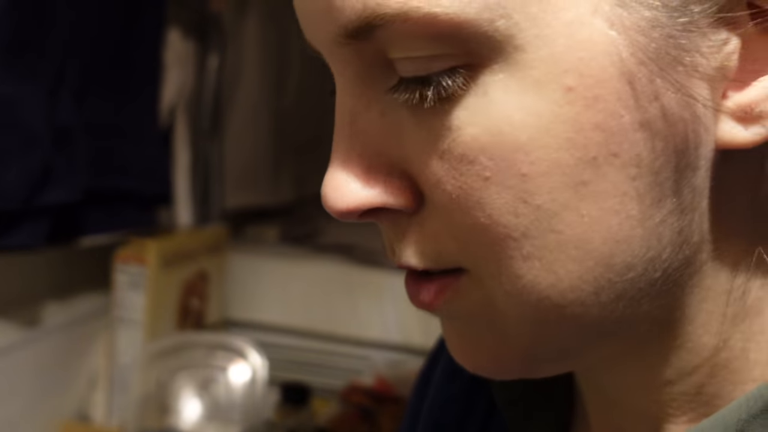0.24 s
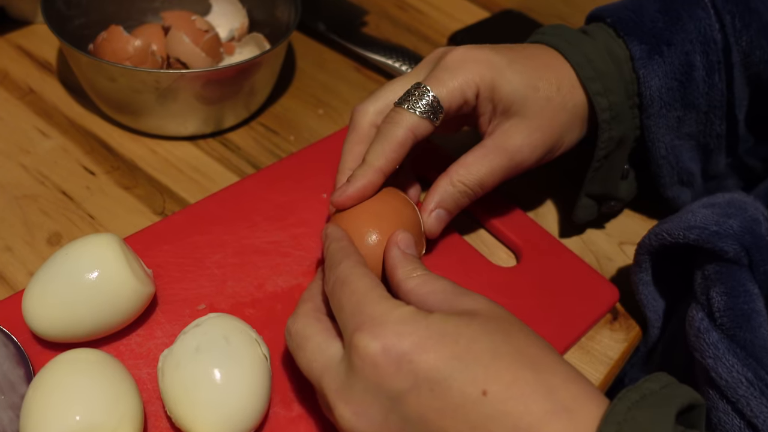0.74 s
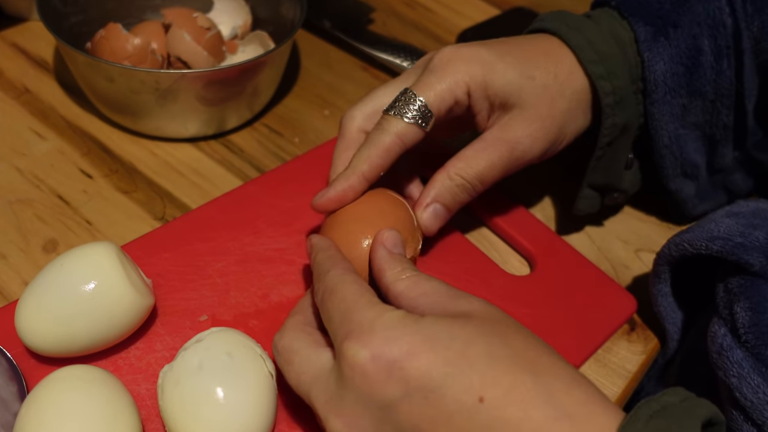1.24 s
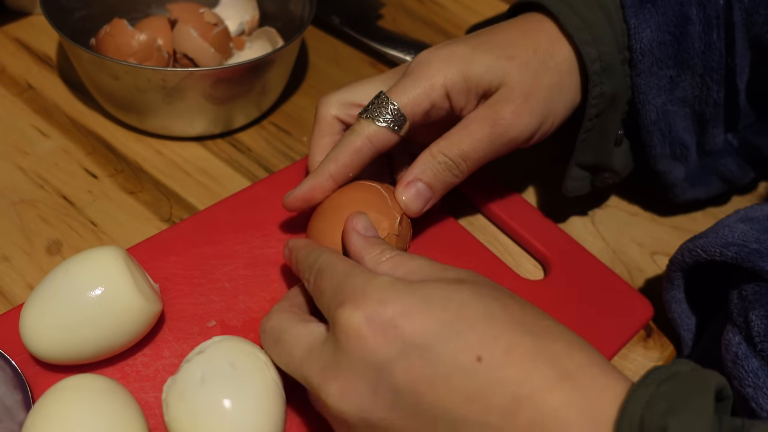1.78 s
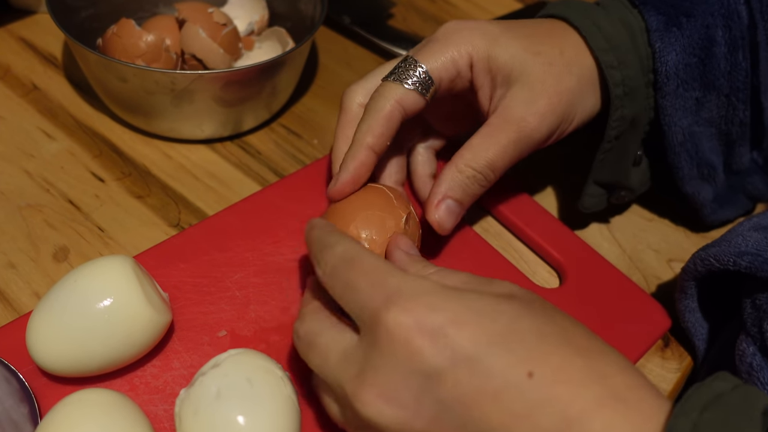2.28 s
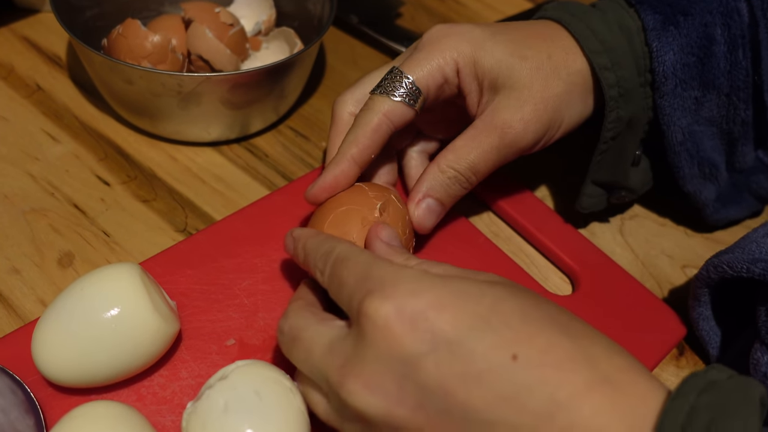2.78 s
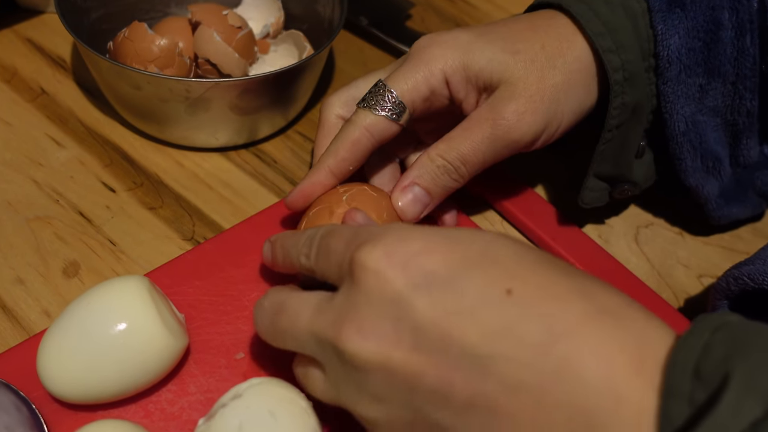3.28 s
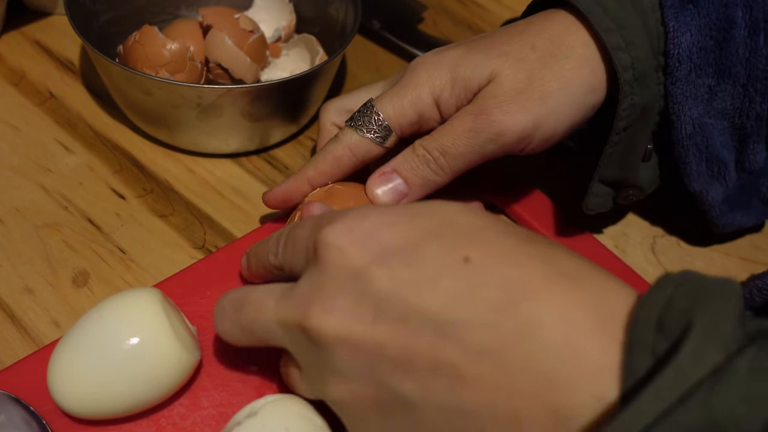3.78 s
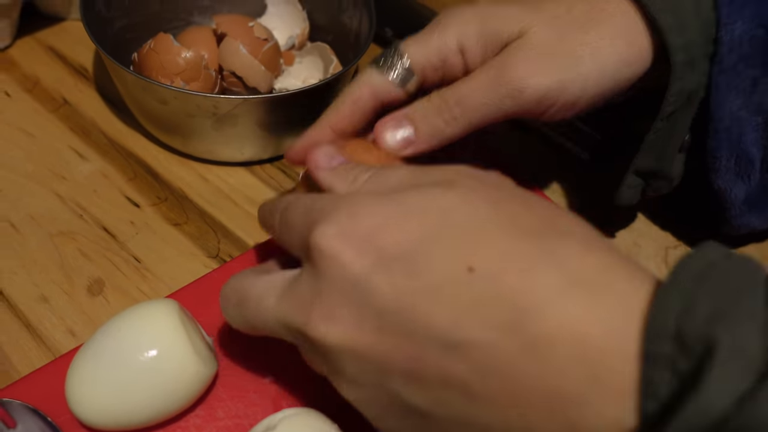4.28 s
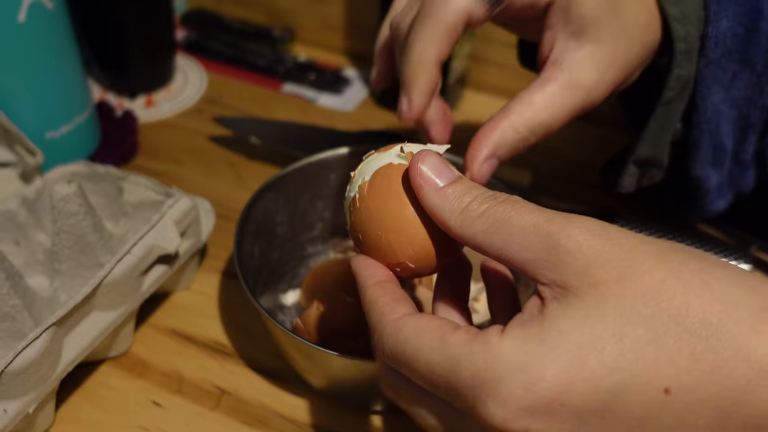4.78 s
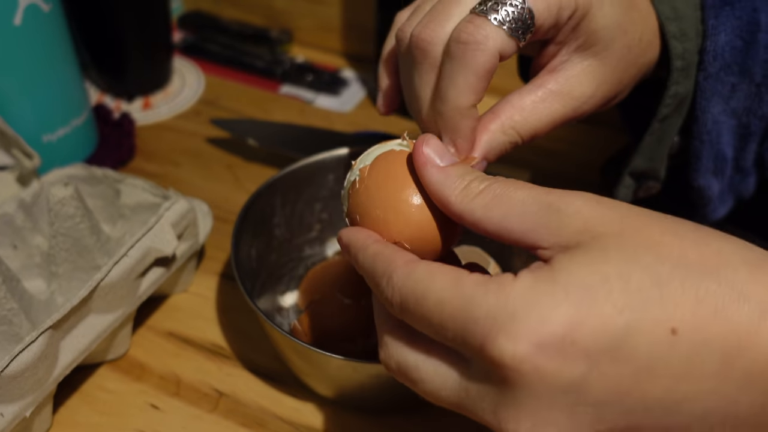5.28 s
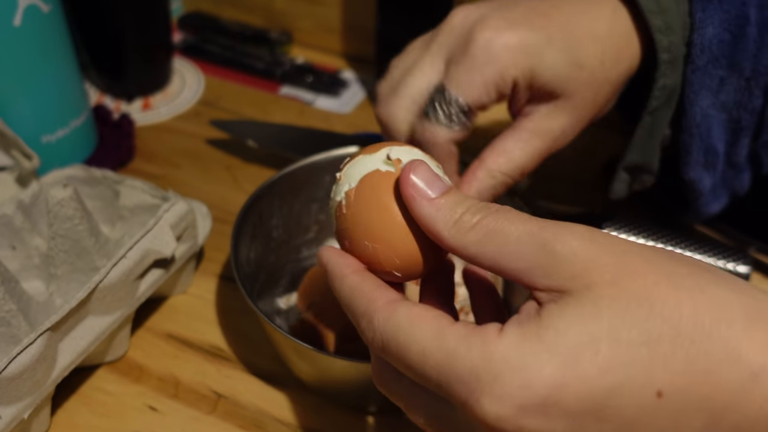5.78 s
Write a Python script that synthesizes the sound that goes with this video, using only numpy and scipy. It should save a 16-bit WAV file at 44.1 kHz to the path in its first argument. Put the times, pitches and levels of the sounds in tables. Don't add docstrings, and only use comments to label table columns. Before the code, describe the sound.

In a small kitchen, heard closely, a few faint flake ticks over low rumble cut to a very brief silence. A boiled egg is then pressed on a plastic board in sharp crackling bursts with knocks and table thumps. After a calm pause it is rolled, crunching densely. Finally shell is picked off quietly, with dry ticks, faint finger rubs and a small high ring from a steel bowl, over a soft fridge hum.

```python
import sys
import numpy as np
from scipy import signal
from scipy.fft import rfft, irfft, next_fast_len
from scipy.io import wavfile
from scipy.ndimage import uniform_filter1d, map_coordinates

SR = 44100
rng = np.random.default_rng(int(sys.argv[2]) if len(sys.argv) > 2 else 0)


def inscribe(sig):
    pcm = np.round(np.clip(np.atleast_2d(sig).T, -1, 1) * 32767)
    wavfile.write(sys.argv[1], SR, pcm.astype(np.int16))


def voltage_ratio(level):
    return 10 ** (np.asarray(level, float) / 20)


N = 266805

# (time [s], crack [dB], brightness [dB], knock [dB], thump [dB])
PRESSES = [
    (0.4999, -26, -17, -43, -55),
    (0.9104, -21, -19, -31.5, -27),
    (0.9313, -21, -9.5, -28.5, -24.5),
    (1.112, -13, -13.5, -24.5, -27.5),
    (1.1925, -19.5, -7, -33, -30),
    (1.4265, -20.5, -19, -29.5, -24),
    (1.4633, -25.5, -3.5, -39, -30),
    (1.8091, -18.5, -12.5, -22, -16.5),
    (1.8278, -25.5, -12, -40, -22.5),
    (2.3723, -26.5, -8, -35, -34),
]
# (time [s], crack [dB], brightness [dB], knock [dB], thump [dB])
ROLLS = [(2.694, -14.5, -4.5, -16.5, -15), (2.753, -26, -5.5, -26, -53), (2.8957, -20, -2, -18.5, -29),
         (3.1208, -17.5, -5, -23.5, -27), (3.1801, -26.5, -10, -18, -18), (3.3048, -18.5, -11, -23.5, -29),
         (3.396, -22.5, -8, -24, -37), (3.4118, -20.5, -11.5, -17.5, -19.5), (3.52, -21, -8.5, -21.5, -33),
         (3.596, -15.5, -5.5, -20.5, -19), (3.666, -39, -28, -30.5, -31), (3.819, -19.5, -6.5, -31, -29.5),
         (3.869, -20.5, 1.5, -14, -11.5), (4.0121, -26, -6, -32, -30), (4.1001, -23.5, -6, -24, -29),
         (4.1197, -22.5, -3.5, -18.5, -14.5)]
# (time [s], peak [dB], brightness [dB])
RUNS = [(0.5056, -32.5, -22), (0.5489, -44, -7), (0.6481, -44.5, -9.5), (0.8945, -37.5, 3),
        (0.9258, -19.5, -3), (0.9523, -29, -9), (0.9874, -31.5, 0), (1.0422, -44.5, -1), (1.1231, -55, -22),
        (1.1366, -52, -13), (1.148, -29.5, -6), (1.172, -39, -3), (1.199, -37, 15), (1.213, -28.5, -8.5),
        (1.4148, -19, -8.5), (1.44, -27.5, -10), (1.4504, -34, -14), (1.456, -25, -20), (1.624, -45.5, 1),
        (1.6357, -48, 1), (1.6409, -41, -9), (1.658, -49, -8), (1.6706, -38.5, -4.5), (1.6796, -44, -28),
        (1.7156, -42.5, -29), (1.8474, -36, -2), (1.8977, -29.5, -8), (1.909, -66, -10.5),
        (2.4645, -48, 7.5)]
# (time [s], peak [dB], brightness [dB])
PLATES = [(2.5528, -37, 5), (2.5581, -33, 4), (2.602, -34.5, -1.5), (2.6767, -41, -5.5), (2.7074, -26, -6),
          (2.7776, -42, 5), (2.8293, -36.5, 4.5), (2.86, -43, -12), (2.9026, -19.5, -6),
          (2.9433, -42.5, -9), (2.9902, -42.5, -5.5), (3.2193, -28.5, -7), (3.2688, -37, -5),
          (3.2944, -18, -4), (3.3424, -47, 19.5), (3.445, -41.5, -2), (3.5486, -31.5, 4), (3.623, -35, -4),
          (3.6607, -36, -2), (3.7115, -33.5, -3), (3.7862, -44, -8), (3.798, -26.5, -2), (3.8083, -28, -3),
          (3.8751, -21, -28), (3.9764, -44.5, -1), (4.0042, -43, 0), (4.0528, -29, -1), (4.1971, -40, 3.5),
          (4.206, -53, 3)]
# (frequency [Hz], width [Hz], level [dB])
SHELL_BODY = [(250, 56, 6), (418, 244, -4), (681.5, 49.9, -0.5), (998, 160, -10), (1350, 92, -1),
              (1780, 190, -3), (2213, 296, -2.5), (2930, 230, -7), (3300, 310, -6.5), (3780, 970, -12),
              (2600, 3200, -17.5)]
SHELL_EDGE = [(4390, 320, 3), (5930, 1100, 0.5), (7540, 1000, -3), (9790, 2500, -10), (12440, 3000, -15.5)]
# (frequency [Hz], width [Hz], level [dB])
FLAKE_BODY = [(334, 94, 4), (827, 100, 4), (1210, 250, -2.3), (1870, 750, -0.9), (3500, 950, -2.2)]
FLAKE_EDGE = [(5000, 3500, -4), (7200, 1500, 5), (11300, 870, -1), (12000, 3700, -10), (14240, 2500, -16)]

PRESS_HZ, ROLL_HZ = 364, 249.6


def egg():
    # (time [s], peak [dB])
    ticks = [(0.6036, -53), (.6231, -64), (0.724, -55), (0.746, -52.5), (0.8228, -55.5), (0.9707, -57),
             (1.0252, -56), (1.0717, -53.5), (1.252, -50.5), (1.3143, -61), (1.39, -48.5), (1.5226, -51.5),
             (1.5788, -60), (1.6155, -47), (1.6993, -44), (1.7646, -46.5), (2.0103, -53.5), (2.1823, -52.5),
             (2.2622, -56), (2.3242, -49.5), (2.6603, -56), (2.7972, -53), (3.018, -47.5), (3.109, -51),
             (3.478, -56), (3.578, -54), (3.678, -44), (3.769, -54), (4.2266, -55), (3.749, -48.5)]
    # (time [s], peak [dB], brightness [dB])
    picked = [(.1976, -39, -30), (.2647, -46.5, -4), (.3176, -42.5, -6.5), (.4155, -58, 10),
              (4.553, -60, 3), (4.6389, -36.5, 7.5), (4.6574, -32, 13), (4.6637, -44, 1), (4.6952, -51, 16),
              (5.0403, -59, 9.5), (5.1367, -58.5, 11.5), (5.1607, -57, 8), (5.2512, -46, 2.5),
              (5.2844, -30, 24), (5.2879, -25, 7.5), (5.3389, -50, 9), (5.4978, -46.5, 14.5),
              (5.5083, -44, -6.5), (5.6145, -50, 40), (5.6606, -55.5, -8), (5.7276, -43, 3),
              (5.7498, -46.5, -13), (5.7861, -58, -12), (5.8205, -51.5, 7), (5.9261, -38.5, 7),
              (5.9474, -54.5, 3), (5.9964, -52.5, 8)]
    # (time [s], peak [dB])
    chips = [(5.27, -52), (5.43, -67), (5.445, -66.5), (5.47, -69.5), (5.484, -59), (5.565, -63),
             (5.575, -62), (5.699, -57), (5.722, -43), (5.805, -61), (5.889, -58), (5.9593, -63),
             (4.6804, -49), (5.518, -52), (4.43, -64), (4.455, -62.5), (4.574, -60.5), (4.79, -69.5),
             (5.091, -74), (5.12, -70), (5.2, -64.5), (5.39, -69)]
    # (frequency [Hz], level [dB])
    crumb_spectrum = [(500, -47.5), (1300, 4.5), (3300, -3.5), (7000, -11), (15000, -25.5)]
    tick_bright_db, chip_bright_db = -7, 7.5

    breaks = [push[:3] for push in PRESSES + ROLLS] + RUNS + PLATES
    breaks += [(*tick, tick_bright_db) for tick in ticks]
    loose = picked + [(*chip, chip_bright_db) for chip in chips]
    cracks = snaps(breaks, SHELL_BODY, SHELL_EDGE, snap_s=.008, lead=1.1,
                   body_tail_s=.06, edge_tail_s=.06, tail_db=-4)
    flakes = snaps(loose, FLAKE_BODY, FLAKE_EDGE, snap_s=.013, lead=1.05,
                   body_tail_s=.05, edge_tail_s=.04, tail_db=-4)
    crumbs = voltage_ratio(-3) * grains(pressure(), crumb_spectrum, spiky_db=5, clump_db=3.5)
    return cracks + flakes + crumbs + rubbing() + bowl()


def splinters():
    # (time [s], peak [dB], brightness [dB])
    splinter_times = [(.683, -57, -5), (.852, -64, -2), (1.0928, -53, -12), (1.1867, -38, -9.5),
                      (1.2614, -52, -4), (1.3673, -59, -9), (1.3804, -55.5, -13), (1.572, -54, 12),
                      (1.6026, -59, -6), (1.6622, -48, -8), (1.7104, -45, -10), (1.7754, -57, 0),
                      (2.393, -52, 4), (2.4314, -70, -8), (2.5405, -55, -3), (2.5446, -55, -2),
                      (2.6686, -61, -4.5), (2.8794, -52, 9), (2.8994, -19, -14), (2.9504, -47, -1),
                      (3.059, -58, -13), (3.1174, -20, -8), (3.206, -56, 5.5), (3.2117, -58, 4),
                      (3.236, -48, -12), (3.2645, -55, -6.5), (3.3826, -54, -4), (3.4963, -53, 4),
                      (3.6368, -60, 3), (3.6844, -49, -9), (3.9986, -51, 0.5), (4.009, -30.5, 3.5),
                      (4.0394, -52, -8), (4.1015, -28.5, -2.5)]
    # (time [s], peak [dB], brightness [dB])
    speck_times = [(0.2204, -64, 8), (0.3884, -64, 6), (4.2812, -60, 9), (4.3604, -64, -1),
                   (4.683, -43.5, 6), (4.7214, -63, 10), (5.0125, -65.5, 8), (5.1784, -63, 8),
                   (5.3744, -67, 7.5), (5.3921, -67.5, 9), (5.4604, -62.5, 12), (5.473, -58, 14),
                   (5.5012, -43, 4), (5.6158, -53, 16), (5.7392, -46, -2), (5.7976, -55.5, 4)]
    # (time [s], level [dB], pitch [Hz])
    nudges = [
        (.207, -37.5, 322),
        (1.677, -32.5, 300),
        (1.773, -47, 280),
        (2.588, -46.5, 260),
        (3.0, -38, 233),
        (3.127, -22, 275),
        (4.06, -36, 250),
        (4.31, -48, 338),
    ]

    side = snaps(splinter_times, SHELL_BODY, SHELL_EDGE, snap_s=.006, lead=1.2,
                 body_tail_s=.05, edge_tail_s=.04, tail_db=-7)
    specks = snaps(speck_times, FLAKE_BODY, FLAKE_EDGE, snap_s=.008, lead=.9,
                   body_tail_s=.04, edge_tail_s=.04, tail_db=-6)
    settling = bending(nudges, rise_s=0.00437, sharp=2.2, droop=0.02, rough=0.28, lift_db=-4)
    return side + specks + plate_rings() + settling


def plate_rings():
    # (time [s], peak [dB], pitch [Hz])
    pings = [(0.2643, -27, 3730), (0.3172, -50, 3620), (0.4993, -19, 1800), (0.9098, -34, 2050),
             (0.9253, -21, 1850), (0.9517, -17, 1900), (0.9862, -18.5, 3190), (1.0725, -33, 1900),
             (1.1124, -3, 1850), (1.1473, -23, 1850), (1.1927, -14, 1870), (1.4142, -22, 1890),
             (1.4262, -12, 1830), (1.4394, -14, 1850), (1.4554, -19, 1820), (1.4626, -20, 1900),
             (1.6412, -39, 1350), (1.6706, -33, 1810), (1.699, -37.5, 1860), (1.7155, -26, 1840),
             (1.8093, -15, 1790), (1.8976, -21, 1350), (2.3236, -36.5, 1820), (2.3725, -17.5, 1810),
             (2.5514, -28, 2070), (2.5571, -26.5, 2320), (2.6015, -24, 2320), (2.6933, -16.5, 1800),
             (2.7521, -12.5, 2125), (2.9018, -24, 1290), (3.1203, -11.5, 1400), (3.1792, -19.5, 1330),
             (3.2191, -29, 2140), (3.2685, -25, 2510), (3.2934, -6, 2760), (3.3044, -26, 1280),
             (3.3952, -16.5, 1360), (3.5189, -29, 1360), (3.5947, -34, 1380), (3.7968, -10.5, 2580),
             (3.8686, -23, 1300), (4.0108, -18, 2720), (4.1011, -17, 2204), (4.6389, -30, 2940),
             (4.6568, -31, 6490), (4.6803, -42, 6470), (5.2834, -30, 7180), (5.7274, -33, 2700),
             (5.9259, -44, 6770),
             (0.197, -45, 3320), (0.5487, -49, 3440), (0.6487, -48, 3200), (0.909, -21, 3260),
                  (0.9308, -24, 3580), (1.1112, -15.5, 3220), (1.1712, -23, 3230), (1.193, -20, 3170),
                  (1.212, -30.5, 3200), (1.4148, -22, 3200), (1.4623, -25, 3220), (1.6412, -38, 3350),
                  (1.671, -44, 4700), (1.8088, -24, 3640), (1.8272, -32, 2740), (2.3718, -27, 6100),
                  (2.5571, -33, 4840), (2.602, -39, 3480), (2.6928, -21, 3570), (2.8952, -23, 2810),
                  (3.12, -14, 2800), (3.1797, -33, 3500), (3.3952, -23, 2840), (3.5194, -22, 2860),
                  (3.5957, -22, 3210), (3.8084, -21, 2700), (3.8691, -23, 3370), (4.1195, -30, 3760),
                  (4.6394, -41, 2930), (4.6634, -40, 6490), (4.6944, -60, 3060), (5.2874, -33, 5880),
                  (5.3383, -56, 5880), (5.5164, -50, 2920), (5.8202, -59, 5900), (5.926, -44, 5110)]
    ping_db, cycles_until_silent, rise_s = -10, 30, .0004

    s, db, hz = np.transpose(pings)[:, :, None]
    t = np.arange(2048) / SR
    decay = voltage_ratio(db + ping_db - 60 * t * hz / cycles_until_silent)
    out = np.zeros(N + SR)
    add(out, s[:, 0], decay * (1 - np.exp(-t / rise_s)) * np.sin(2 * np.pi * hz * t))
    return out[:N]


def rubbing():
    # (time [s], held [s], level [dB])
    rubs = [
        (4.66, .03, -64.5),
        (5.04, 0.28, -81),
        (5.3, .02, -61.5),
        (5.4, 0.092, -79),
        (5.51, 0.0052, -49.5),
        (5.62, 0.14, -69),
        (5.82, 0.11, -85),
        (5.99, .06, -90.5),
    ]
    # (frequency [Hz], level [dB])
    skin = [(880, -33), (1500, -1.5), (1690, 1), (2790, -6), (3410, -10), (5640, -8), (11700, -4.5),
            (16000, -12), (16500, -34)]

    level_db = strokes(rubs, rise=1010, fall=800)
    draw = rng.standard_normal((3000, 3))
    t = np.arange(800) / SR
    hz = np.clip(8500 * np.exp(0.22 * draw[:, :1]), 1500, 15500)
    life_s = .018 * voltage_ratio(4 * draw[:, 2:])
    chip_rings = voltage_ratio(3 * draw[:, 1:2] - 60 * t / life_s) * np.sin(2 * np.pi * hz * t)
    rattle = np.zeros(N + SR)
    add(rattle, rng.uniform(0, N / SR, len(draw)), chip_rings)
    skin_hiss = voltage_ratio(-4) * grains(level_db, skin, spiky_db=5, clump_db=2.2)
    return voltage_ratio(level_db - 6) * unit(rattle[:N]) + skin_hiss


def bowl():
    # (time [s], level [dB])
    landings = [
        (4.697, 6),
        (5.6145, 20.5),
        (5.648, -1),
        (5.70, 2),
    ]
    # (frequency [Hz], level [dB])
    modes = [(5722, -85.5), (6223, -94), (6740, -90), (7639, -91), (8656, -87), (10524, -78), (10680, -85),
             (11057, -89), (11429, -87), (11838, -82), (12118, -89), (12694, -91), (13297, -95),
             (13561, -93)]
    t60_s = .22

    t = np.arange(SR // 4) / SR
    out = np.zeros(N + SR)
    hz, db = np.transpose(modes)[:, :, None]
    fall_db = 60 * t / t60_s * np.sqrt(hz / hz.min())
    for s, level_db in landings:
        chance = rng.standard_normal((2, len(modes), 1))
        ring = voltage_ratio(level_db + db + 3 * chance[0] - fall_db) * np.sin(2 * np.pi * hz * t + 9 * chance[1])
        add(out, [s], [ring.sum(0)])
    return out[:N]


def board_and_table():
    # (time [s], held [s], level [dB])
    grinds = [
        (.93, .01, -63),
        (1.68, 0.011, -47),
        (2.6, 0.014, -49),
        (3.69, .01, -45.5),
        (3.8, 0.091, -36),
        (5.75, 0.0092, -53),
    ]
    # (frequency [Hz], level [dB])
    board_spectrum = [(120, -39), (220, 3.5), (280, -2.5), (420, -5.5), (600, -19.5), (1000, -27.5),
                      (2000, -74)]
    grumble_db = 5

    board = bending(knocks(), rise_s=0.00435, sharp=1.6, droop=0.02, rough=0.25, lift_db=1.14)
    top = bending(thumps(), rise_s=.018, sharp=4, droop=.02, rough=.1, lift_db=1.2)
    grind_db = strokes(grinds, rise=830, fall=300)
    grind_db = np.maximum(grind_db, pressure() + grumble_db)
    return board + top + grains(grind_db, board_spectrum, spiky_db=5, clump_db=4)


def knocks():
    rebound_s, rebound_db, rebound_hz = .01906, -11.5, 213.5
    light_knock_db = -10.5

    rows = []
    for pushes, hz in ((PRESSES, PRESS_HZ), (ROLLS, ROLL_HZ)):
        rows += [(s, knock_db, hz) for s, _, _, knock_db, _ in pushes]
    rows += [(s + rebound_s, db + rebound_db, rebound_hz) for s, db, _ in rows]
    for cracks, hz in ((RUNS, PRESS_HZ), (PLATES, ROLL_HZ)):
        rows += [(s, db + light_knock_db, hz) for s, db, _ in cracks]
    return spread(rows, lag_ms=7.38)


def thumps():
    swing_s, swing_db = .0512, -17.5
    rows = [(s, thump_db, 101.2) for s, *_, thump_db in PRESSES + ROLLS]
    rows += [(s + swing_s, db + swing_db, hz) for s, db, hz in rows]
    return spread(rows, lag_ms=18.56)


def spread(rows, lag_ms):
    s, db, hz = np.transpose(rows)
    spot = 1 + 0.033 * rng.standard_normal(len(s))
    return np.transpose([s + lag_ms / 1000, db, hz * spot])


def pressure():
    # (time [s], level [dB])
    crumb_levels = [
        (0.489, -72),
        (0.92, -78.5),
        (1.2, -64.5),
        (1.749, -70.5),
        (2.12, -75),
        (3.74, -65),
        (4.361, -68.5),
    ]
    return curves([(.48, -120), *crumb_levels, (4.365, -120)])[0]


def kitchen():
    # (from [s], rumble [dB], room [dB], hiss [dB])
    views = [
        (0, -39, -53.5, -67),
        (.47, -44.5, -58, -75),
        (4.36, -45.5, -58, -72.5),
    ]
    # (from [s], pitch [Hz], level [dB])
    hum_steps = [
        (0, 117, -54),
        (.47, 119.5, -43.5),
        (1.9, 115.7, -74),
        (4.36, 125.9, -48),
        (5.1, 125.1, -53),
    ]
    # (frequency [Hz], level [dB])
    rumble_spectrum = [(8, -36.5), (14, 4), (36, 9), (50, -2.5), (63, -6.5), (76, 0), (88, -3), (103, -21),
                       (125, -11), (150, -34), (188, -11.5), (215, -42.5), (350, -120)]
    room_spectrum = [(41, -30.5), (70, -5), (133, -12), (155, -22), (188, -21), (327, -33), (352, -34.5),
                     (497, -45.5), (604, -39), (744, -41.5), (2500, -62), (3250, -75.5), (5500, -120)]
    hiss_spectrum = [(710, -52), (1200, -34), (1340, -10.5), (1490, -16.5), (1650, 1), (1880, -6),
                     (2370, -1.5), (2610, -10), (3080, -6), (5820, -12), (14300, -18.5), (16000, -16.5),
                     (16500, -25.5)]
    fan_spectrum = [(2750, -30), (3020, 0), (3300, -3), (3800, -25)]

    rumble_db, room_db, hiss_db = steps(views)
    noise = rng.standard_normal((4, N))
    rumble = voltage_ratio(rumble_db + 5.0 + 0.48 * wobble(2.1)) * colour(noise[0], rumble_spectrum)
    room = voltage_ratio(room_db + 10.0 + 0.78 * wobble(4.6)) * colour(noise[1], room_spectrum)
    hiss = voltage_ratio(hiss_db - 7.5) * colour(noise[2], hiss_spectrum)
    fan = voltage_ratio(hiss_db - 14 + 1.2 * wobble(12)) * colour(noise[3], fan_spectrum)
    hz, db = steps(hum_steps)
    hum_turns = np.cumsum(hz + 3 * wobble(18)) / SR
    hum = voltage_ratio(db + 0.78 * wobble(3)) * np.sin(2 * np.pi * hum_turns)
    whine_level = voltage_ratio(np.maximum(hiss_db - 26.5, -100))
    whine = whine_level * np.sin(2 * np.pi * 13894 * np.arange(N) / SR)
    return rumble + room + hiss + hum + fan + whine


def snaps(rows, body, edge, snap_s, lead, body_tail_s, edge_tail_s, tail_db):
    s, db, bright_db = np.transpose(rows)
    breaks = fracture(db, snap_s, lead)
    low = ringing(breaks + voltage_ratio(tail_db) * echo(len(s), body_tail_s), body)
    high = ringing(breaks + voltage_ratio(tail_db + 2.5) * echo(len(s), edge_tail_s), edge)
    share = voltage_ratio(np.maximum(bright_db, -26))[:, None]
    blend = (low + share * high) / np.sqrt(1 + share ** 2)
    out = np.zeros(N + SR)
    add(out, s - .0004, voltage_ratio(db - 4.5)[:, None] * blend)
    return out[:N]


def fracture(db, snap_s, lead):
    t = np.arange(4096) / SR
    draw = rng.standard_normal((len(db), 2, len(t)))
    life_s = snap_s * voltage_ratio(2 * rng.standard_normal((len(db), 1)))
    breaks = draw[:, 0] * voltage_ratio(7 * draw[:, 1]) * voltage_ratio(-60 * t / life_s)
    breaks /= np.linalg.norm(breaks, axis=1, keepdims=True)
    breaks[:, 8] += lead
    return breaks


def echo(count, tail_s):
    t = np.arange(4096) / SR
    shape = voltage_ratio(-60 * t / tail_s) * (1 - np.exp(-t / .0025)) * (t < .085)
    tail = rng.standard_normal((count, len(t))) * shape
    return tail / np.linalg.norm(tail, axis=1, keepdims=True)


def ringing(blows, modes, scatter_db=2, detune=.015):
    f = np.fft.rfftfreq(blows.shape[1], 1 / SR)
    chance = rng.standard_normal((len(blows), 2, len(modes), 1))
    response = 0
    for k, (hz, width, db) in enumerate(modes):
        centre = hz * (1 + detune * chance[:, 0, k])
        strength = (-1) ** k * voltage_ratio(db + scatter_db * chance[:, 1, k])
        damping = 1j * f * width
        response = response + strength * damping / (centre ** 2 - f * f + damping)
    rung = irfft(rfft(blows) * response, blows.shape[1])
    return rung / np.sqrt(uniform_filter1d(rung ** 2, size=53).max(1, keepdims=True))


def bending(rows, rise_s, sharp, droop, rough, lift_db):
    s, db, hz = np.transpose(rows)
    u = np.arange(4096) / SR / rise_s
    swell = (u * np.exp(1 - u)) ** sharp
    turns = hz[:, None] * rise_s * (u - droop * np.exp(1 - u))
    chance = rng.uniform(0, 1, (len(s), 5, 1))
    wave = np.sin(2 * np.pi * (turns + chance[:, 0]))
    upper = np.sin(2 * np.pi * ((1.382 + 0.4 * chance[:, 1]) * turns + chance[:, 2]))
    lower = np.sin(2 * np.pi * ((.6 + 0.17 * chance[:, 3]) * turns + chance[:, 4]))
    out = np.zeros(N + SR)
    add(out, s - rise_s, voltage_ratio(db + lift_db)[:, None] * swell * (wave + rough * (upper + lower)))
    return out[:N]


def grains(level_db, spectrum, spiky_db, clump_db):
    sizes = voltage_ratio(spiky_db * rng.standard_normal(N) + clump_db * wobble(90))
    return voltage_ratio(level_db) * colour(sizes * rng.standard_normal(N), spectrum)


def strokes(rows, rise, fall):
    s, held, db = np.transpose(rows)[:, :, None]
    t = np.arange(N) / SR
    before, after = np.maximum(s - t, 0), np.maximum(t - s - held, 0)
    return (db - rise * before - fall * after).max(0)


def steps(rows):
    s, *cols = np.transpose(rows)
    now = np.searchsorted(s, np.arange(N) / SR, side="right") - 1
    return [c[now] for c in cols]


def curves(rows):
    s, *cols = np.transpose(rows)
    return [np.interp(np.arange(N) / SR, s, c) for c in cols]


def wobble(rate):
    knots = rng.standard_normal(int(N * rate / SR) + 4)
    return map_coordinates(knots, [np.arange(N) * rate / SR])


def colour(x, spectrum):
    m = next_fast_len(N + 8192)
    hz, db = np.transpose(spectrum)
    gain = voltage_ratio(np.interp(np.log(np.fft.rfftfreq(m, 1 / SR) + 1), np.log(hz + 1), db))
    return unit(irfft(rfft(x, m) * gain, m)[:N])


def unit(x):
    return x / np.sqrt(np.mean(x ** 2) + 1e-20)


def add(out, starts_s, rows):
    for s, row in zip(starts_s, rows):
        out[round(s * SR):][:len(row)] += row


def scene():
    shell = egg() + splinters()
    sound = shell + board_and_table() + kitchen()
    drift = unit(wobble(400)) * (wobble(14) > 0)
    treble = signal.butter(12, 1300, "high", fs=SR, output="sos")
    side = voltage_ratio(-24) * signal.sosfilt(treble, shell * drift)
    return np.array([sound + side, sound - side])


def flickering_treble(x):
    thin_hz, edge_hz, top_hz = 15020, 15800, 16600
    thin_db, edge_db = 2.2, 17
    hz, _, z = signal.stft(x, SR, nperseg=1024)
    power = uniform_filter1d(abs(z[0]) ** 2, size=5, axis=0)
    power = uniform_filter1d(power, size=4, axis=1)
    quiet = np.percentile(power[(hz > thin_hz) & (hz < edge_hz)], 25)
    bands = [hz > top_hz, hz > edge_hz, hz > thin_hz]
    needed = quiet * np.select(bands, [np.inf, *voltage_ratio([edge_db, thin_db]) ** 2])[:, None]
    return signal.istft(z * (power >= needed), SR, nperseg=1024)[1][:, :N]


def band_limit(x):
    return signal.sosfilt(signal.butter(12, 16600, fs=SR, output="sos"), x)


def record(dry):
    # (start [s], end [s])
    gap = (.4445, 0.484)
    t = np.arange(N) / SR
    left = gap[0] - t
    closing = np.clip(left / .00008, 0, 1) * np.clip(.55 + left / .012, 0, 1)
    opening = np.clip((t - gap[1]) / 0.0027, 0, 1)
    gate = np.where(t < gap[0], closing, opening)
    low_pass = signal.butter(16, 16300, fs=SR, output="sos")
    dull = signal.sosfilt(low_pass, flickering_treble(dry))
    fade_in = np.clip(t / .004, 0, 1)
    return band_limit(dull * gate * fade_in)


dry = scene()
out = record(dry)
inscribe(out)
```